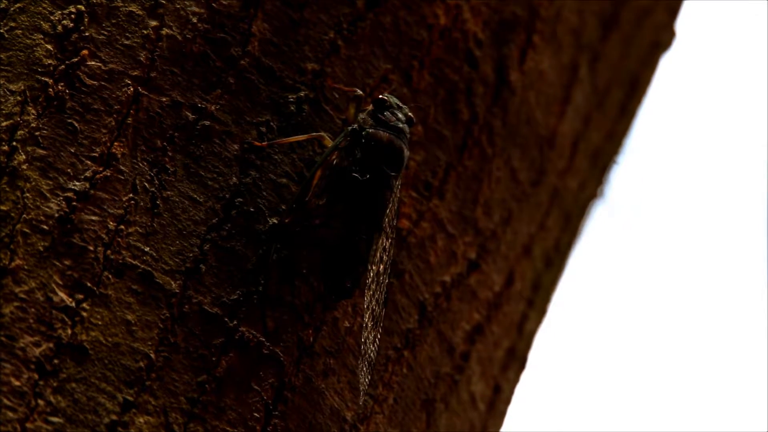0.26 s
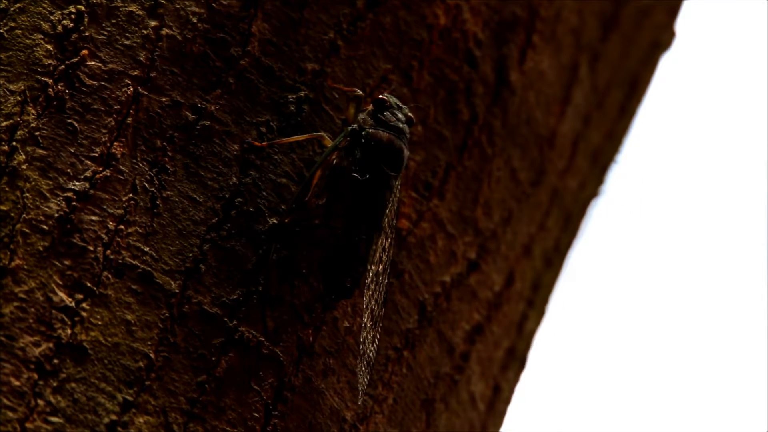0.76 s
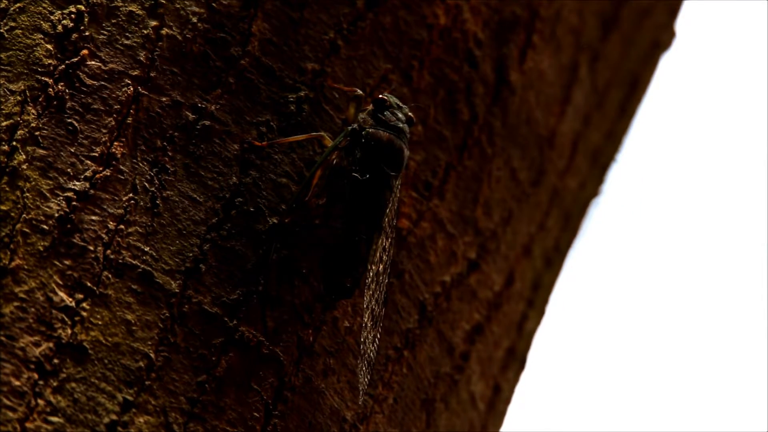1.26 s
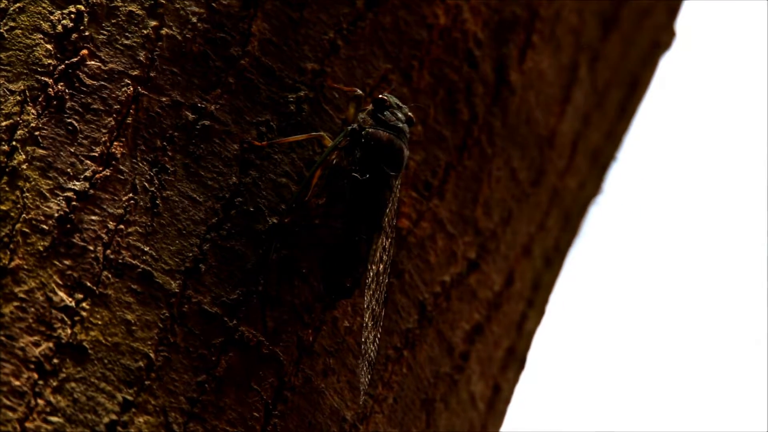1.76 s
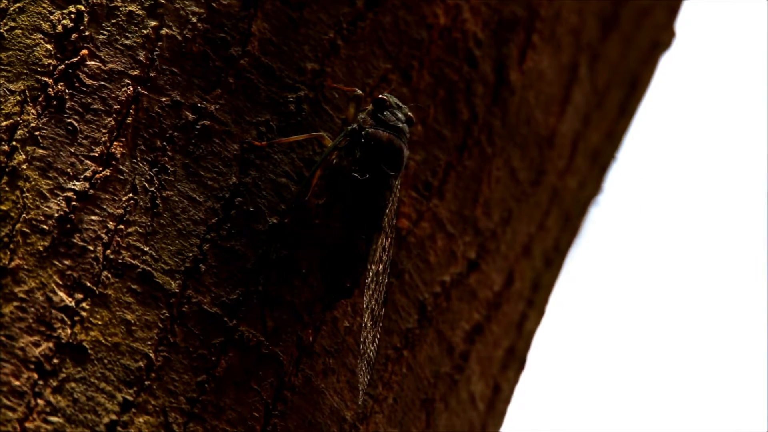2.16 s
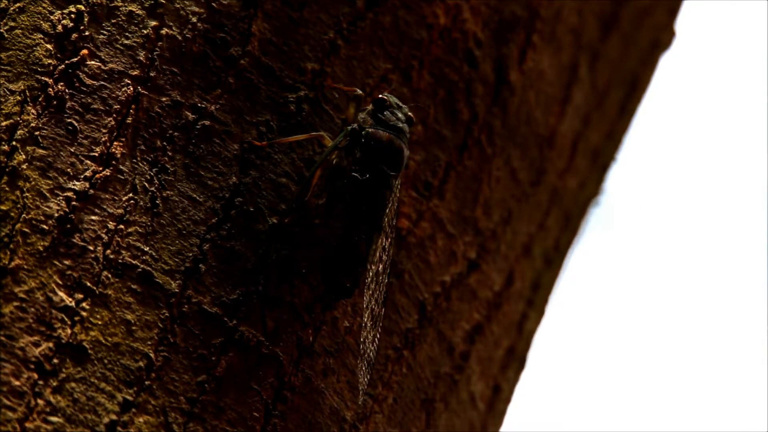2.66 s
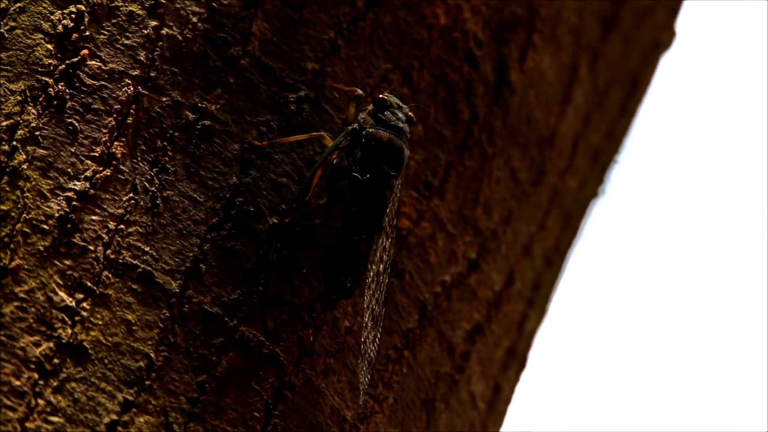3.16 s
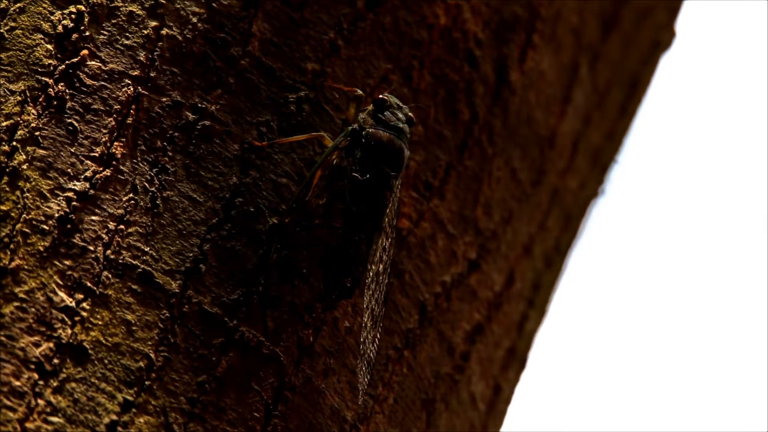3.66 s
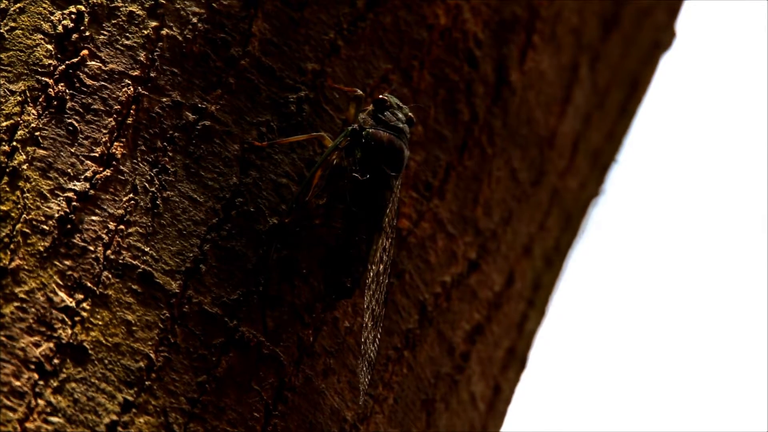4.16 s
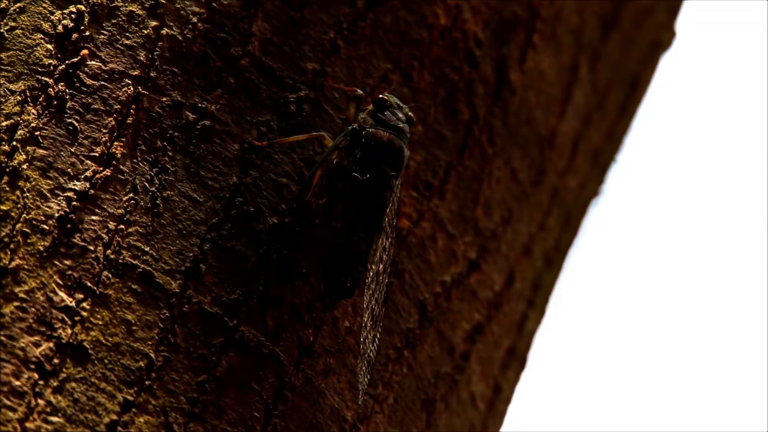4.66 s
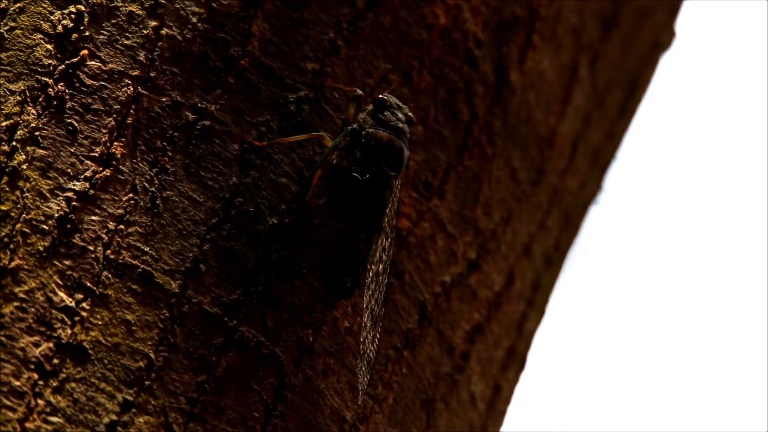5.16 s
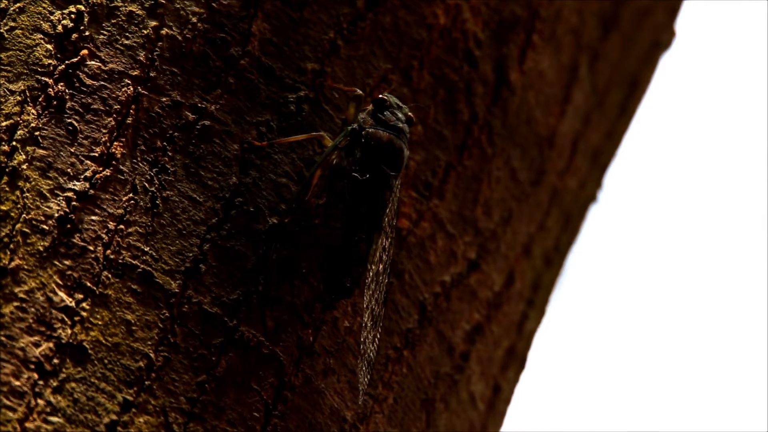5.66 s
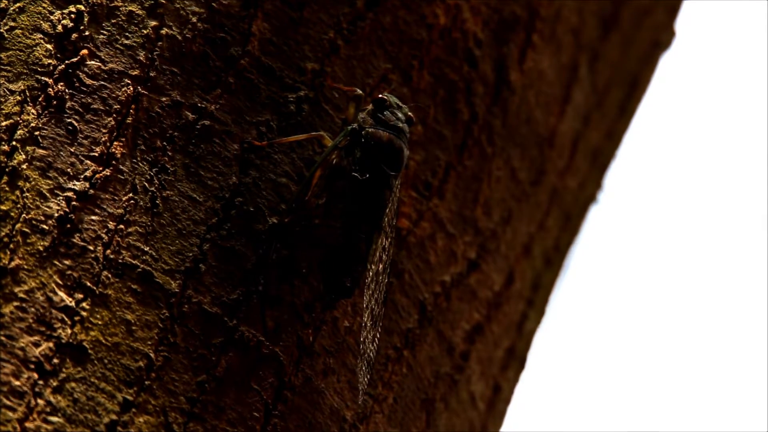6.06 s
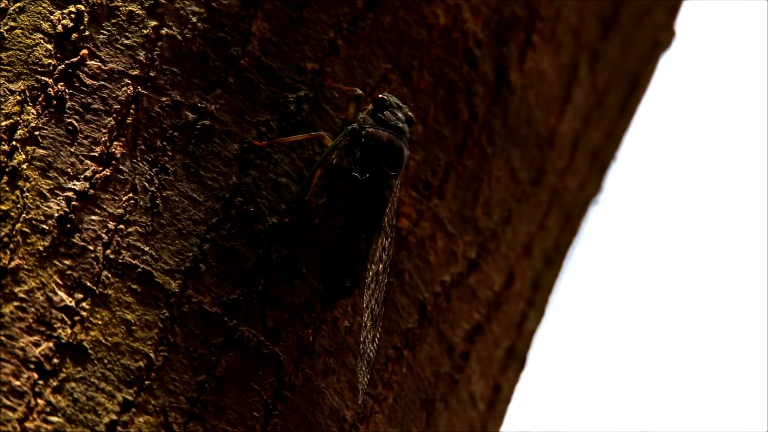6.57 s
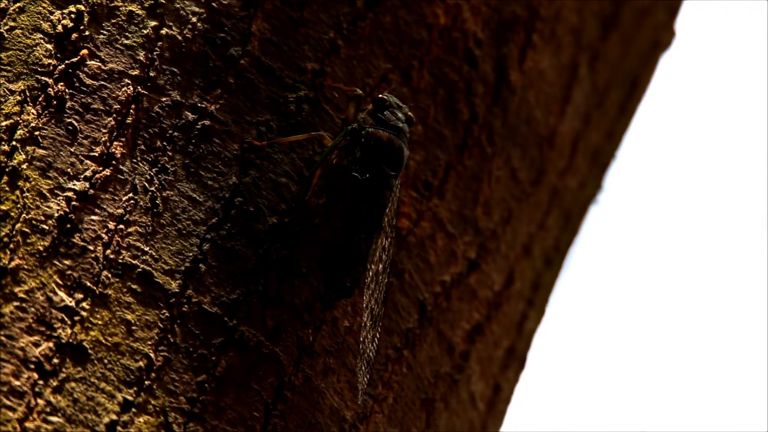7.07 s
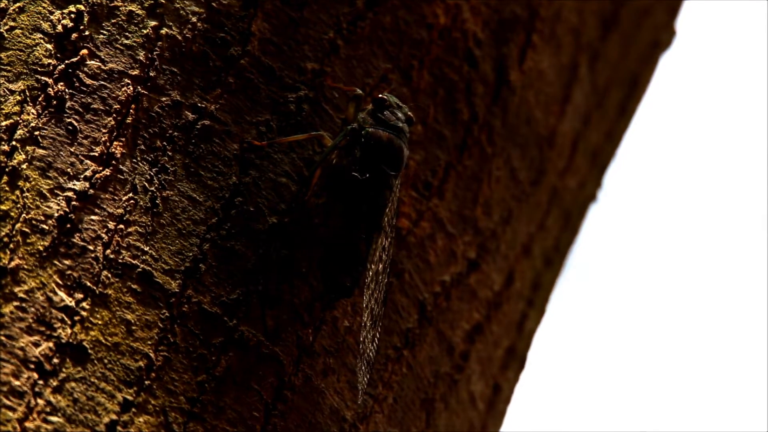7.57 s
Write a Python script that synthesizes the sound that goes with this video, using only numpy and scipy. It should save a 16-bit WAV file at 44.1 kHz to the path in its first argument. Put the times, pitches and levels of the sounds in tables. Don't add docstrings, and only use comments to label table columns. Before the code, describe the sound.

Outdoors near a tree, heard in stereo. From 0 s a wide, soft rush of many far cicadas hangs in the air, with a high hiss throbbing about three or four times a second, a gentle distant town wash and barely audible deep vehicle rumble, strongest near 0.8 s. Two small hidden clickers make dry, hollow mid-pitched snaps at irregular moments, some in quick pairs, each with the same short, hard echoes; they are densest from 0.7 to 2.7 s. Tiny drips blip near 2.1 s and again around 2.7 to 2.9 s. From about 2.5 s a close cicada emerges, slightly left, its rattling buzz pulsing nearly fifty times a second. It swells through 4 s, is strong by 5 s, turns brighter and smoother around 5.7 s, then holds loud and piercing with leafy echoes until 7.8 s, snaps still poking through.

```python
import sys
import numpy as np
from scipy import signal
from scipy.fft import rfft, irfft, next_fast_len
from scipy.io import wavfile
from scipy.ndimage import uniform_filter1d, map_coordinates

SR = 44100
rng = np.random.default_rng(int(sys.argv[2]) if len(sys.argv) > 2 else 0)


def unload_audio(sound):
    columns = np.transpose(np.atleast_2d(sound))
    steps = np.round(np.clip(columns, -1, 1) * 32767)
    wavfile.write(sys.argv[1], SR, steps.astype(np.int16))


def volts(x):
    e = np.asarray(x, float) / 20
    return 10 ** e


N = 343980
LEAD = 2048

# (time [s], level [dB])
SONG = [(2.9, -49), (3.3, -46.5), (3.75, -46), (3.95, -43.5), (4.16, -42.5), (4.23, -40), (4.6, -38.5),
        (4.9, -37), (5.1, -35.5), (5.4, -35), (5.6, -36), (5.85, -34.5), (6.28, -35), (6.4, -34),
        (7.0, -34), (7.3, -33.5), (7.8, -34)]
# (time [s], stretch [0-1])
STRETCH = [(0, 0.4), (4.0, 0.43), (4.5, 0.35), (5.25, 0.3), (5.7, 0.87), (7.8, 0.97)]
# (time [s], swell [dB])
THROBS = [(0.2, 2.5), (0.51, 1), (0.75, -0.5), (0.95, 1), (1.49, 3.5), (1.8, 1), (2.02, 2.5), (2.45, 2),
          (2.78, -0.5), (3.05, 2.5), (3.55, 0), (3.95, 1), (4.25, 1), (4.58, 1), (4.75, -2), (5.02, 1),
          (5.32, 3), (5.67, -1), (5.88, -1), (6.12, 1), (6.42, -7), (6.7, 3), (6.9, 2), (7.2, 1), (7.53, 3)]
THROB_S = 0.042


def cicada():
    # (frequency [Hz], width [Hz], level [dB])
    drum = [(5470, 1240, 0), (5770, 390, 1.5), (6150, 1100, -3), (6930, 1240, -4.5)]
    belly = [(3686, 240, -0.5), (3390, 350, -9)]
    slack_waist = [(4060, 830, 5), (4450, 360, -7)]
    stretched_waist = [(4670, 390, 9), (4580, 340, -1.5), (4150, 540, 2), (3340, 330, -3)]
    rib_edges = [(7980, 2400, 6.5), (9070, 1400, 8), (11200, 2000, -0.5), (11900, 740, -23)]

    stretch = np.clip(curve(STRETCH), 0, 1)
    belly_gain = volts(-11 + 5.5 * stretch)
    slack_gain = volts(-3.5 - 0.5) * np.sqrt(1 - stretch)
    waist_gain = volts(-3.5) * stretch
    edge_gain = volts(-15.5 + 6.5 * stretch)

    body = body_part(drum, 1, lag_ms=0.35)
    body = body + body_part(belly, belly_gain, lag_ms=1.1)
    body = body + body_part(slack_waist, slack_gain, lag_ms=1.05)
    body = body + body_part(stretched_waist, waist_gain, lag_ms=0.95)
    body = body + body_part(rib_edges, edge_gain, lag_ms=0.05)

    def small_body(f):
        return 1 / np.sqrt(1 + (3150 / (f + 1)) ** 16)

    fade_db = -30 * np.clip(1 - (np.arange(N) / SR - 1.6) / 1.15, 0, 1)
    return volts(curve(SONG) + fade_db - 2.0) * filtered(body, small_body)


def body_part(modes, gain, lag_ms):
    drive = snaps(jitter_ms=0.12, scatter_db=-0.4, crackle=0.52, whir=1.0, pull_db=4.5)

    def ring(f):
        power = sum(abs(volts(db) * peak(f, hz, width_hz)) ** 2 for hz, width_hz, db in modes)
        return np.sqrt(power) * delay(f, lag_ms)

    return gain * volts(0.1 * wobble(12)) * unit(filtered(drive, ring))


def snaps(jitter_ms, scatter_db, crackle, whir, pull_db):
    # (time [s], rate [cycles/s])
    cycle = [(2.2, 46), (3, 46.8), (3.4, 47.8), (4, 48.6), (4.6, 49), (5.2, 49.5), (5.6, 49.9), (6.2, 49.4),
             (6.8, 49.7), (7.8, 50)]
    # (share of cycle [0-1], level [dB])
    ribs = [(0, 0), (.155, -2), (.345, -1), (.505, -1), (.655, -6), (.84, -7)]

    turns = np.cumsum(curve(cycle)) / SR
    share, db = np.transpose(ribs)
    due = np.arange(int(turns[-1]))[:, None] + share
    at = np.interp(due, turns, np.arange(N))
    chance = rng.standard_normal(at.shape + (2,))
    at = np.clip(at + jitter_ms * SR / 1000 * chance[..., 0], 0, N - 1).astype(int)
    strength = volts(db + scatter_db * chance[..., 1])
    ticks = np.bincount(at.ravel(), strength.ravel(), N)

    fading = volts(-60 * np.arange(600) / SR / 0.039)
    crackle_level = signal.fftconvolve(ticks, fading)[:N]
    depth_db = pull_db * (1 - 0.64 * curve(STRETCH))
    pull_shape = np.cos(2 * np.pi * (turns - 0.3)) + 0.6 * np.cos(4 * np.pi * (turns - 0.03))
    pull = volts(depth_db * pull_shape)
    noise_level = crackle * unit(crackle_level) + whir * unit(pull)
    return unit(ticks) + noise_level * rng.standard_normal(N)


def low_clicker():
    # (time [s], peak level [dB])
    single_snaps = [(0.7114, -31.5), (0.8957, -31), (0.9683, -33), (1.1767, -32), (1.8542, -32.5),
                    (2.199, -32), (2.4037, -31.5), (2.5394, -30), (2.6772, -31.5), (3.302, -31.5),
                    (3.7068, -32.5), (3.9747, -31.5), (4.0762, -31), (4.1791, -31.5), (5.3786, -32),
                    (5.5488, -32.5), (5.8445, -33), (6.1605, -31.5), (7.0105, -31.5), (7.1659, -33),
                    (7.3918, -32), (7.5416, -31.5)]
    # (delay [ms], level [dB])
    left_paths = [(0.0, -3.0), (0.95, 0.0), (1.36, -7.6), (2.02, -12.5), (3.31, -13.1), (6.01, -9.4),
                  (9.41, -5.4), (12.13, -10.4), (15.46, -13.4), (18.48, -16.7), (24.54, -14.9),
                  (25.51, -9.4)]
    right_paths = [(0.09, -6.0), (0.48, -0.7), (1.45, -2.4), (1.9, -7.0), (2.29, -6.7), (3.38, -0.4),
                   (6.03, -4.0), (7.55, -7.4), (9.46, -3.5), (12.18, -2.3), (14.33, -8.5), (25.53, -7.3)]
    return clicker(single_snaps, (left_paths, right_paths), 1820, 530, overtone_db=-9.5)


def high_clicker():
    # (time [s], peak level [dB])
    first_snap = (-.0098, -34)
    # (time [s], peak level [dB])
    single_snaps = [(0.673, -32), (0.8854, -32), (1.108, -32.5), (1.332, -33.5), (1.4696, -33),
                    (1.6137, -32.5), (1.9144, -31.5), (2.0032, -32), (2.547, -31.5), (4.0643, -31),
                    (4.744, -32), (5.286, -32), (5.406, -32.5), (6.7946, -33), (6.917, -32), (7.7116, -31),
                    (7.7768, -32.5)]
    # (first time [s], second time [s], peak level [dB])
    double_snaps = [(0.1931, 0.232, -33), (1.0296, 1.071, -32), (2.155, 2.1902, -31.5),
                    (2.2503, 2.2942, -32), (3.6674, 3.7021, -32.5), (3.913, 3.9424, -32),
                    (4.5272, 4.5596, -32), (5.2092, 5.2436, -32), (7.5913, 7.6226, -33)]
    # (delay [ms], level [dB])
    left_paths = [(0.0, -19.3), (0.93, 0.0), (4.31, -13.7), (6.49, -8.9), (8.28, -12.1), (9.91, -9.4),
                  (12.13, -9.5), (14.29, -19.3), (15.44, -16.1), (19.89, -18.4), (23.95, -18.8),
                  (25.49, -9.9)]
    right_paths = [(0.98, -0.4), (2.27, -4.8), (3.38, -2.9), (6.53, -8.9), (7.55, -8.7), (8.84, -7.8),
                   (9.93, -9.3), (12.15, -2.4), (14.33, -10.2), (19.89, -13.8), (24.97, -8.9),
                   (26.53, -15.9)]

    pairs = [(s, db) for *both, db in double_snaps for s in both]
    events = [first_snap, *single_snaps, *pairs]
    return clicker(events, (left_paths, right_paths), 1899, 467, overtone_db=-8)


def clicker(events, paths, hz, width_hz, overtone_db):
    s, db = np.transpose(events)
    at = np.round(s * SR).astype(int) + LEAD
    blows = np.bincount(at, volts(db), N + LEAD)

    def body(f):
        overtone = volts(overtone_db) * ping(f, 4100, 1200)
        return ping(f, hz, width_hz) + overtone - volts(-19.5) * ping(f, 2750, 500)

    def ways(f):
        return [sum(volts(db) * delay(f, ms) for ms, db in ear) for ear in paths]

    snap = filtered(signal.unit_impulse(4 * LEAD), body)
    heard = filtered(snap, ways) + volts(-8.5) * grove(snap, apart=0.8)
    return signal.fftconvolve(blows[None], heard, axes=1)[:, LEAD:N + LEAD]


def drips():
    # (time [s], peak level [dB], pitch [Hz], half length [ms], left over right [dB])
    drops = [
        (2.056, -35.5, 2800, 1.9, 4),
        (2.0643, -40, 3200, 1.3, 4),
        (2.0655, -42, 756, 1.4, 4),
        (2.076, -46, 805, 2.4, 8),
        (2.729, -45.5, 2600, 1.2, 1),
        (2.851, -42, 2700, 1.3, 0),
    ]
    out = np.zeros((2, N))
    for s, db, hz, half_ms, pan_db in drops:
        u = np.arange(-LEAD, LEAD) / SR / (half_ms / 1000)
        tone = np.sin(2 * np.pi * hz * half_ms / 1000 * (u + 0.05 * u ** 2))
        blip = volts(db) * np.exp(-u ** 2) * tone
        start = round(s * SR) - LEAD
        out[:, start:start + 2 * LEAD] += volts([[pan_db / 2], [-pan_db / 2]]) * blip
    return out


def far_chorus():
    # (frequency [Hz], level [dB per Hz])
    colour = [(1530, -15.5), (2600, -3), (3060, -2.5), (3330, 0), (3650, -1), (4560, 1.5), (5020, -0.5),
              (5600, 2.5), (6510, 1.5), (9870, -12), (11000, -25.5), (14300, -31), (22000, -120)]
    swell_db = 0.4 * np.arange(N) / SR + 0.45 * wobble(4) + 0.4 * wobble(9)
    throb_db = 0.23 * swells(THROBS, THROB_S)
    return volts(-47.5 + swell_db + throb_db) * rush(colour, patchy_db=1.1) * volts([[0.4], [-0.4]])


def throbbing_hiss():
    # (frequency [Hz], level [dB per Hz])
    colour = [(4710, -16.5), (8000, -9.5), (9860, -12), (14900, -16), (15700, -22)]
    effort_db = curve(SONG)
    voice_share = volts(effort_db - effort_db.max())
    hiss_db = -54.5 + 2 * voice_share + 1.4 * swells(THROBS, THROB_S) + 0.7 * wobble(7.1)
    return volts(hiss_db) * rush(colour, patchy_db=1.2) * volts([[0.4], [-0.4]])


def town_air():
    # (frequency [Hz], level [dB per Hz])
    colour = [(76, -23), (130, -3), (663, -1.5), (1200, -2.5), (1580, -2), (3000, -5), (3900, -4.5),
              (6600, -120)]
    return volts(-52.5 + 0.99 * wobble(3.43)) * rush(colour, patchy_db=0.43)


def far_vehicles():
    # (frequency [Hz], level [dB per Hz])
    colour = [(15, -34), (25, -5.5), (97, 2.5), (160, -7.5), (210, -35), (350, -120)]
    # (time [s], swell [dB])
    passing = [
        (0.3, 1),
        (0.8, 9),
        (1.75, 3),
        (5.5, 3),
        (7.55, 3),
    ]
    rumble_db = -69.5 + swells(passing, half_s=0.13) + 0.6 * wobble(2.98)
    return volts(rumble_db) * rush(colour, patchy_db=2.0) * volts([[-0.4], [0.4]])


def rush(spectrum, patchy_db):
    # (frequency [Hz], left-right likeness [0-1])
    alike = [(60, 0.41), (150, 0.083), (380, 0.49), (950, 0.57), (2380, 0.55), (5980, 0.52), (15000, 0.17)]
    z = signal.stft(rng.standard_normal((2, N)), nperseg=512)[2]
    field = uniform_filter1d(rng.standard_normal(z.shape[1:]), size=6, axis=0)
    field = uniform_filter1d(field, size=14, axis=1)
    pair = signal.istft(z * volts(patchy_db * unit(field)), nperseg=512)[1][:, :N]

    def colour_and_width(f):
        turn = np.arccos(np.clip(along(alike, f), -1, 1)) / 2
        return volts(along(spectrum, f)) * [np.cos(turn), np.sin(turn)]

    mid, side = filtered(pair, colour_and_width)
    return unit(np.array([mid + side, mid - side]))


def grove(x, apart):
    # (frequency [Hz], time to fall 60 dB [s])
    fade_times = [(1500, 0.29), (4000, 0.14), (10000, 0.22)]
    hz, t, z = signal.stft(rng.standard_normal((2, SR // 4)), SR, nperseg=128)
    fading = volts(-60 * t / along(fade_times, hz)[:, None])
    both, one = signal.istft(z * fading, SR, nperseg=128)[1]
    tail = np.array([both + apart * one, both - apart * one]) / np.linalg.norm(both)
    late = np.pad(x, (130, 0))
    return signal.fftconvolve(late[None], tail, axes=1)[:, :len(x)]


def swells(events, half_s):
    s, db = np.transpose(events)
    return db @ np.exp(-((np.arange(N) / SR - s[:, None]) / half_s) ** 2)


def peak(f, hz, width_hz):
    return (1j * f * width_hz / (hz * hz - f * f + 1j * f * width_hz)) ** 2


def ping(f, hz, width_hz):
    return peak(f, hz, width_hz) * SR * np.e / (2 * np.pi * width_hz)


def delay(f, ms):
    return np.exp(-2j * np.pi * f * ms / 1000)


def filtered(x, response):
    m = next_fast_len(x.shape[-1] + SR // 4)
    spectrum = rfft(x, m) * response(np.fft.rfftfreq(m, 1 / SR))
    return irfft(spectrum, m)[..., :x.shape[-1]]


def unit(x):
    return x / np.sqrt(np.mean(x ** 2) + 1e-20)


def along(points, hz):
    f, v = np.transpose(points)
    return np.interp(np.log(hz + 1), np.log(f + 1), v)


def curve(rows):
    s, v = np.transpose(rows)
    return np.interp(np.arange(N) / SR, s, v)


def wobble(rate):
    knots = rng.standard_normal(int(N * rate / SR) + 4)
    return map_coordinates(knots, [np.arange(N) * rate / SR])


def scene():
    song = cicada()
    blend_angle = 2 * np.pi * 1.3 * np.arange(N) / SR
    echoes = grove(song * np.cos(blend_angle), apart=0.67) + grove(song * np.sin(blend_angle), apart=0.87)
    singer = volts([[0.75], [-0.75]]) * (song + volts(-4.5) * echoes)
    background = far_chorus() + throbbing_hiss() + town_air() + far_vehicles()
    return singer + low_clicker() + high_clicker() + drips() + background


def top_cut(x):
    return signal.sosfilt(signal.butter(12, 15880, fs=SR, output="sos"), x)


def record(dry):
    hz, t, z = signal.stft(dry, SR, nperseg=LEAD)
    power = np.sum(abs(z[0]) ** 2, axis=0)
    loud_db = 10 * np.log10(uniform_filter1d(power, size=9) + 1e-12)
    hz_per_db = 20 + 130 * rng.random(len(t)) ** 2
    top_hz = 15750 - np.clip(loud_db + 46, 0, 12) * hz_per_db
    kept = signal.istft(z * (hz[:, None] < top_hz), SR, nperseg=LEAD)[1][:, :N]
    return top_cut(kept)


dry = scene()
out = record(dry)
unload_audio(out)
```